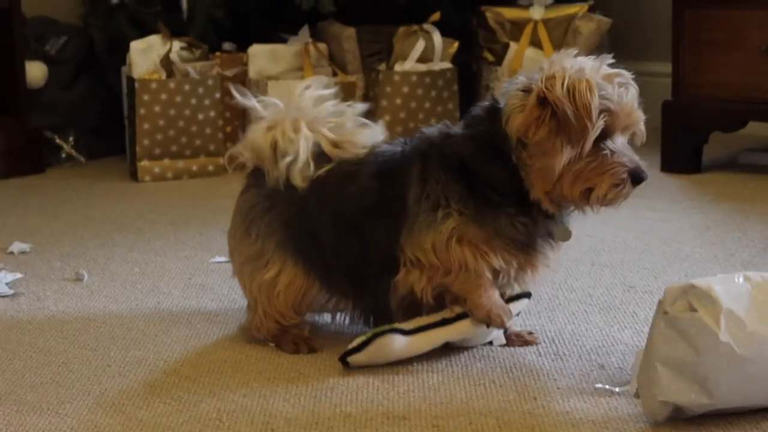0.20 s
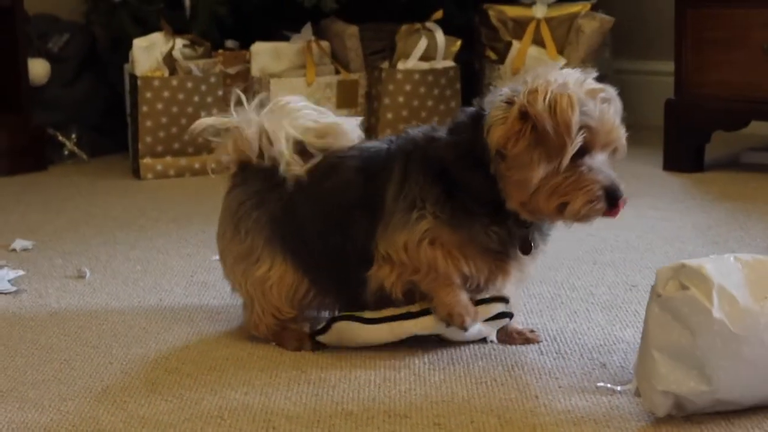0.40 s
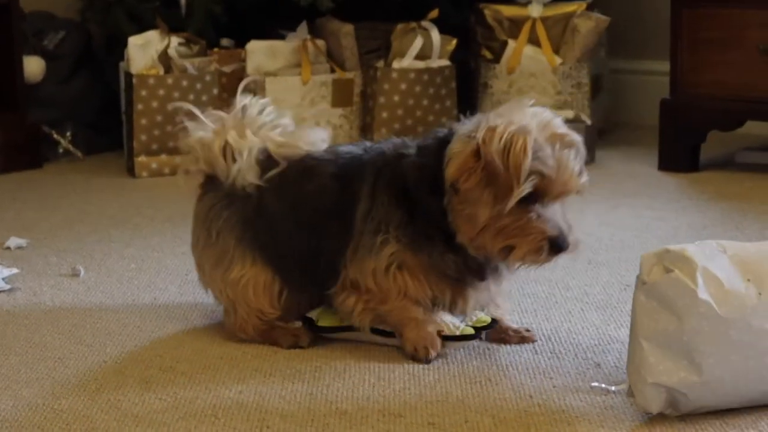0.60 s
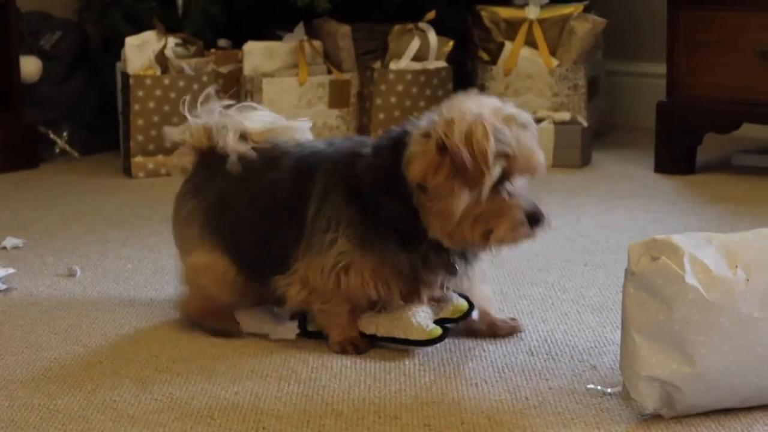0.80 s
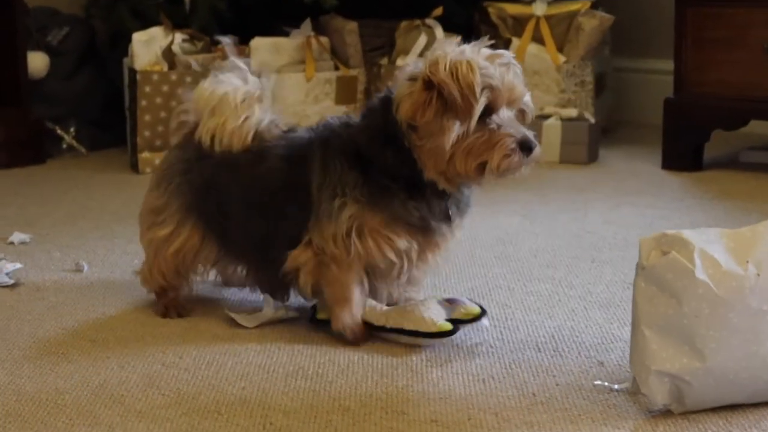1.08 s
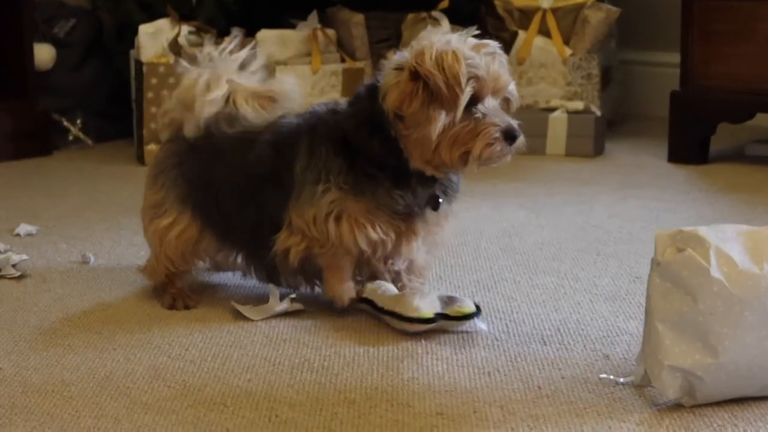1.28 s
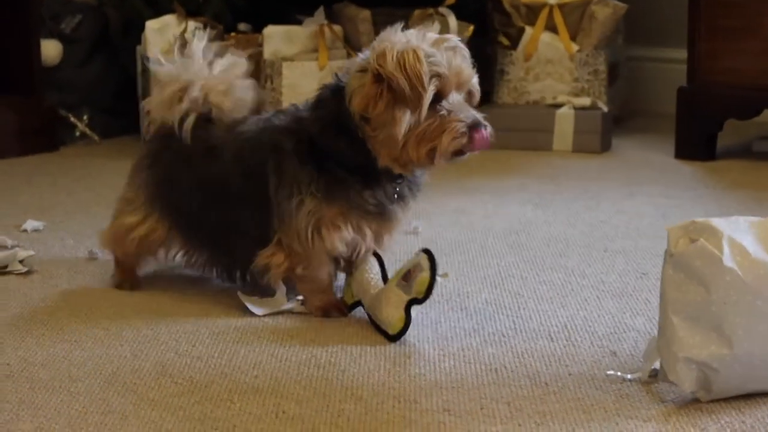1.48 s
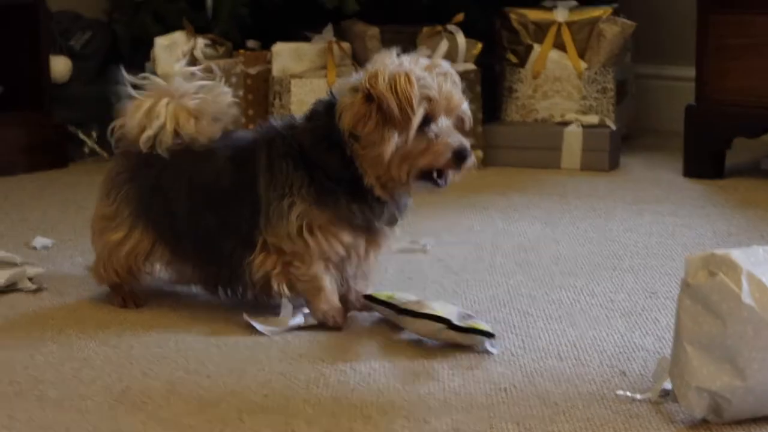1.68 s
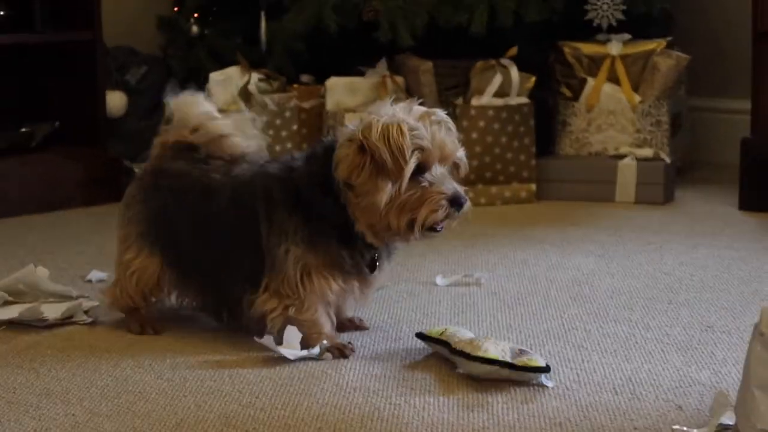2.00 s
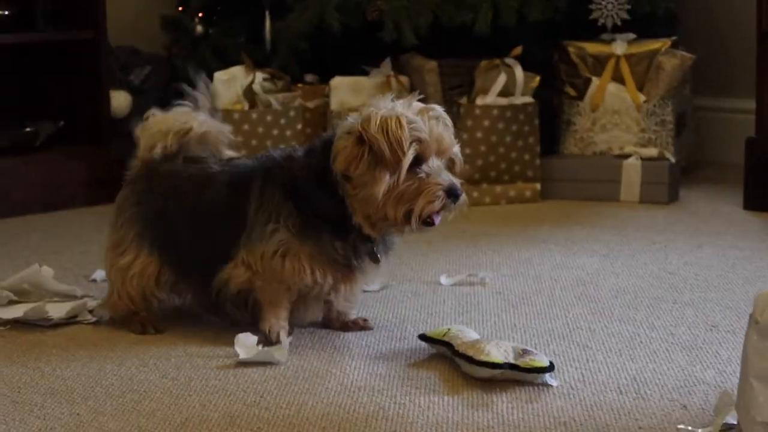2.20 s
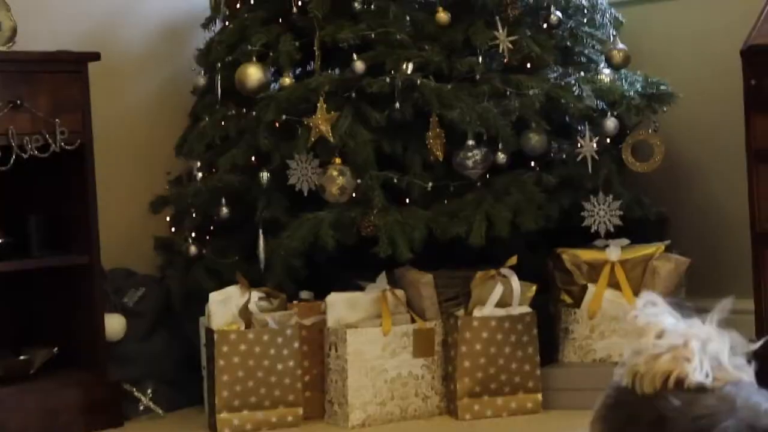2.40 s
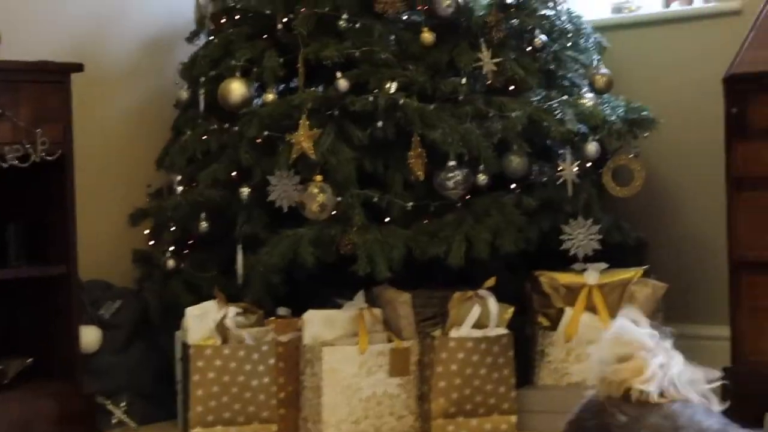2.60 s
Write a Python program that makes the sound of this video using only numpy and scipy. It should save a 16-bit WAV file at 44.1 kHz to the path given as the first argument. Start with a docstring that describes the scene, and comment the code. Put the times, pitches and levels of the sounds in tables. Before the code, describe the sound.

Stiff wrapping paper crumples and rustles in uneven bursts as a small dog plays on carpet

```python
"""Crumpling stiff paper

Stiff paper, most likely gift wrap, is pulled and crumpled in uneven bursts in a carpeted living room.
Each rustle is a swarm of random impulses, tiny buckling creases, that ring brief facets of the sheet.
Larger folds give way with single snaps and dull pops; taut patches resonate as short pitched rasps.
Decaying sines make soft pats and low thumps, and shaped noise makes the rumble of movement and the air.
A short diffuse room tail follows the paper and the pats.
"""
import sys
import numpy as np
from scipy import signal
from scipy.fft import rfft, irfft
from scipy.io import wavfile
from scipy.ndimage import uniform_filter1d

SR = 44100
rng = np.random.default_rng(int(sys.argv[2]) if len(sys.argv) > 2 else 0)


def master(y):
    """Save y as 16-bit WAV."""
    cut = np.clip(np.atleast_2d(y).T, -1, 1)
    pcm = np.round(cut * 32767)  # scale
    wavfile.write(sys.argv[1], SR, pcm.astype(np.int16))


N = 119070  # samples
T = np.arange(N) / SR  # time [s]
TOP_HZ = 15550  # upper limit of the recorder

CREASES_PER_S, CREASE_SPREAD_DB = 1250, 3.5
SLIP_S, SLIP_DB = 0.004, 2  # length and depth of each cluster of creases
ATTACK_SHARE, RELEASE_S = 0.18, 0.01  # swell as a share of a pull's length; decay time constant
RASP_Q = 13.5
FOLLOW_S, FOLLOW_DB = 0.0062, -1  # decay and energy, against the snap, of the creases it drags along
RUSTLE_DB, SNAP_DB = -0.52, 17.5  # added to the levels in their tables
RUMBLE_DB = 4.5  # added to the level curve of the rumble
AIR_DB = -47.5
ROOM_DB, ROOM_GAP_S = -5.5, 0.0032  # tail energy against the direct sound; silence ahead of the tail
SCATTER_S = 0.0006  # peak time of the early scatter envelope
THUMP_S, PAT_S = 0.019, 0.0011  # time to the envelope peak
BUMP_SAG_PER_S = 4.6  # exponential rate at which a bump's pitch falls as the contact slackens


def undb(db):
    """Logarithmic level: convert decibels to amplitude gain."""
    return 10 ** (np.asarray(db) / 20)


def unit(x):
    """Energy normalisation: scale the sum of squares to 1."""
    return x / np.sqrt(np.sum(x ** 2) + 1e-18)


def along(points, hz):
    """Logarithmic frequency scale: interpolate (frequency [Hz], value) points on it."""
    point_hz, values = np.array(points, float).T
    return np.interp(np.log(np.maximum(hz, 1)), np.log(point_hz), values)


def colour(x, points, size=4096):
    """Minimum phase: folding the cepstrum gives a causal filter through (frequency [Hz], gain [dB])."""
    gain = undb(along(points, np.fft.rfftfreq(size, 1 / SR)))
    cepstrum = irfft(np.log(gain))
    cepstrum[1:size // 2] *= 2
    cepstrum[size // 2 + 1:] = 0
    response = irfft(np.exp(rfft(cepstrum)))[:size // 2]
    return signal.fftconvolve(x, response)[:len(x)]


def noise(points):
    """Spectral shaping: filter white noise and scale it to rms 1."""
    return unit(colour(rng.standard_normal(N), points)) * np.sqrt(N)


def air():
    """Stationary random noise: the steady background of the room."""
    # background spectrum: (frequency [Hz], relative density [dB per Hz])
    air_spectrum = [(30, -21), (70, -5.5), (150, -13), (450, -16.5), (1340, -24), (2300, -22),
                    (7600, -38.5), (15000, -57)]
    return undb(AIR_DB) * noise(air_spectrum)


def rumble():
    """Amplitude modulation: low noise follows the level of movement on the carpet."""
    # spectrum of the movement: (frequency [Hz], relative density [dB per Hz])
    rumble_spectrum = [(25, -50), (38, -6), (52, -8), (75, -12), (108, 5), (160, 1.5), (230, 6.5),
                       (330, -3), (480, -32)]
    # strength of the movement ahead of RUMBLE_DB: (time [s], level [dB])
    level_curve = [(0, -55), (.6, -51.5), (1.95, -48.5), (2.4, -55.5), (2.55, -82)]
    times, db = np.array(level_curve).T
    return noise(rumble_spectrum) * undb(np.interp(T, times, db) + RUMBLE_DB)


def room_tail(size=16384, count=9):
    """Reverberation: diffuse echoes, even in colour, decay at a rate that depends on frequency."""
    # decay of the furnished room: (frequency [Hz], time to fall by 60 dB [s])
    decay_times = [(200, 0.6), (550, 0.22), (1400, 0.32), (3700, 0.31), (10000, 0.13)]
    spectrum, t = rfft(rng.standard_normal(size)), T[:size]
    hz, centres = np.fft.rfftfreq(size, 1 / SR), np.geomspace(100, TOP_HZ, count)
    tail = np.zeros(size)
    for centre_hz, pick in zip(centres, np.eye(count)):
        weight = along(list(zip(centres, pick)), hz)  # overlapping triangular bands
        decay = np.exp(-np.log(1000) * t / along(decay_times, centre_hz))
        tail += irfft(spectrum * weight, size) * decay
    # divide by the smoothed spectrum to even out the colour
    modes = rfft(tail, 2 * size)
    tail = irfft(modes / np.sqrt(uniform_filter1d(abs(modes) ** 2, size=70)))[:size]
    onset = np.clip(t / ROOM_GAP_S - 1, 0, 1)
    return unit(tail * onset) * undb(ROOM_DB)


def room_paths():
    """Direct and diffuse fields: the mid path has a direct impulse, the side path early scatter."""
    centre, across = room_tail(), room_tail()
    centre[0] += 1
    lag = T[:len(across)] / SCATTER_S
    across += unit(rng.standard_normal(len(lag)) * lag * np.exp(-lag))
    return unit(centre), unit(across)


def bumps(rows, peak_s):
    """Damped oscillation: cushioned bumps swell and die while their pitch falls exponentially."""
    out = np.zeros(N)
    for start, hz, db in rows:
        age = np.maximum(T - start, 0)
        envelope = age / peak_s * np.exp(1 - age / peak_s)
        cycles = hz * (1 - np.exp(-BUMP_SAG_PER_S * age)) / BUMP_SAG_PER_S
        out += undb(db) * envelope * np.sin(2 * np.pi * cycles)
    return out


def thumps():
    """Damped oscillation: soft low thumps with a slow swell."""
    # soft low thumps: (time [s], starting pitch [Hz], envelope peak [dB])
    thump_events = [(0.57, 116, -40), (.595, 215, -39), (.885, 66.4, -38.5), (1.35, 119, -37.5),
                    (1.5, 255.6, -34.5), (1.766, 80, -41)]
    return bumps(thump_events, THUMP_S)


def pats():
    """Damped oscillation: dull pats, probably paws and the toy on the carpet."""
    # dull pats, ahead of the room: (time [s], starting pitch [Hz], envelope peak [dB])
    pat_events = [(.142, 556, -25.5), (.221, 515, -19.5), (.403, 634, -19.5), (.457, 620, -43),
                  (.492, 587, -40), (.556, 640, -21.5), (.79, 580, -22.5), (1.029, 695, -19),
                  (1.882, 520, -24), (2.168, 510, -24)]
    return bumps(pat_events, PAT_S)


def pull(length, size=8820):
    """Transient envelope: a pull swells linearly, holds and lets go exponentially."""
    age = T[:size]
    swell = np.clip(age / (ATTACK_SHARE * length), 0, 1)
    return swell * np.exp(-np.maximum(age - length, 0) / RELEASE_S)


def swarm_of_creases(shape):
    """Stick-slip and random impulses: creases of uneven size cluster as the paper catches and slips."""
    size, hold = len(shape), int(SLIP_S * SR)
    grip = rng.standard_normal(size)[np.arange(size) // hold]  # one value for each cluster
    db = CREASE_SPREAD_DB * np.clip(rng.standard_normal(size), -2, 2)
    db += SLIP_DB * np.clip(grip, -1, 1)
    buckles = rng.random(size) < CREASES_PER_S / SR
    return buckles * undb(db) * rng.choice([-1, 1], size) * shape


def rasps():
    """Resonance: creases drive one taut patch, and the rustle takes on its pitch."""
    # rasps of taut paper, ahead of the room: (time [s], length [s], pitch [Hz], level [dB])
    rasp_events = [(0.325, 0.019, 3340, -34.5), (0.542, 0.01, 3000, -31.5), (1.951, 0.063, 1780, -34),
                   (1.983, 0.011, 4160, -36), (2.037, 0.024, 1600, -34.5), (2.14, .05, 2370, -36.5)]
    out = np.zeros(2 * N)
    for start, length, hz, db in rasp_events:
        shape, i = pull(length), int(start * SR)
        resonator = signal.iirpeak(hz, RASP_Q, fs=SR)
        ring = signal.lfilter(*resonator, swarm_of_creases(shape))
        out[i:i + len(ring)] += undb(db) * np.linalg.norm(shape) * unit(ring)
    return out[:N]


def sheet_response(low_hz, high_hz, size=1024):
    """Transfer function: the sheet's colour within one frequency range."""
    # colour of the sheet: (frequency [Hz], relative density [dB per Hz])
    sheet_colour = [(150, 1), (225, 1), (330, -1.5), (480, 0.5), (720, 2), (950, -2.5), (1400, -4.5),
                    (2200, -3.5), (3200, -6), (4400, -15), (6000, -17.5), (8000, -23.5), (11000, -31),
                    (15000, -24)]
    band = signal.butter(3, [low_hz, high_hz], "band", fs=SR, output="sos")
    return rfft(signal.sosfilt(band, colour(signal.unit_impulse(size), sheet_colour)))


def sheet_ranges():
    """Frequency-dependent damping: each range of the sheet pairs a response with a ring time."""
    # crackle, body and treble of the sheet: (low edge [Hz], high edge [Hz], ring time constant [s])
    range_rows = [(980, 5200, 0.0011), (282, 898, 0.0023), (3710, 12000, 0.0012)]
    return [(sheet_response(low, high), ring_s) for low, high, ring_s in range_rows]


def facet(response, ring_s, size=1024):
    """Impulse response: one patch of paper rings briefly when it buckles; no two are alike."""
    ring = rng.standard_normal(size) * np.exp(-T[:size] / ring_s)
    return unit(irfft(rfft(ring) * response))


def snaps(ranges, size=900):
    """Sudden buckling: a large fold gives a bright tick or dull pop, and neighbouring creases follow."""
    # snaps of single folds ahead of SNAP_DB: (time [s], crackle [dB], body [dB], treble [dB])
    snap_events = [(0.328, -30.5, -34, -30.5), (0.337, -29.5, -46, -26.5), (.345, -34, -42, -26),
                   (.547, -30, -18, -25.5), (0.578, -14.5, -20, -27), (.655, -24, -22, -45),
                   (.702, -17, -25.5, -27.5), (.949, -25, -43, -36), (1.022, -32, -34, -37),
                   (1.036, -19.5, -33, -25.5), (1.179, -38, -31, -21), (1.215, -23, -20, -22.5),
                   (1.309, -39, -42, -31), (1.351, -19, -13.5, -27), (1.367, -22, -20, -27),
                   (1.38, -15, -17, -25), (1.426, -41, -41, -24), (1.493, -24.5, -20, -30.5),
                   (1.616, -16.5, -45, -26), (1.625, -28, -16.5, -23), (1.644, -15, -14, -31),
                   (1.704, -18.5, -22, -26.5), (1.801, -36, -20, -32), (1.946, -21.5, -43, -26),
                   (1.955, -40, -50, -20), (2.043, -50, -25.5, -27), (2.242, -36, -35, -31),
                   (2.274, -30, -56, -22.5), (2.424, -37, -35, -35)]
    out = np.zeros(N + 4 * size)
    for start, *levels in snap_events:
        buckles = rng.random(size) < CREASES_PER_S / SR
        followers = buckles * rng.standard_normal(size) * np.exp(-T[:size] / FOLLOW_S)
        push = unit(followers) * undb(FOLLOW_DB)
        push[0] += 1  # the fold itself
        i = int(start * SR)
        for db, (response, ring_s) in zip(levels, ranges):
            snap = unit(signal.fftconvolve(push, facet(response, ring_s)))
            out[i:i + len(snap)] += undb(db + SNAP_DB) * snap
    return out[:N]


def rustles(ranges, count=7):
    """Superposed impulse responses: each pull buckles a few fresh facets, so its colour is its own."""
    # pulls ahead of RUSTLE_DB: (time [s], length [s], crackle [dB], body [dB], treble [dB])
    pull_events = [(0.0, 0.064, -56.5, -45.5, -73), (0.092, 0.039, -42.5, -41.5, -79),
                   (0.136, 0.049, -40, -42, -70), (0.215, 0.024, -31.5, -36.5, -42.5),
                   (0.263, 0.13, -46.5, -51, -55), (0.331, 0.03, -44, -52, -56),
                   (0.401, 0.13, -47, -41, -61), (0.551, 0.026, -34.5, -35, -36),
                   (0.579, 0.022, -31, -33, -30.5), (0.625, 0.096, -38.5, -42.5, -41),
                   (0.699, 0.022, -34, -33, -37), (.74, .15, -41, -39.5, -49),
                   (.786, 0.012, -35, -48, -37.5), (0.895, 0.03, -27.5, -34.5, -38.5),
                   (.938, 0.038, -37.5, -38.5, -45.5), (1.02, 0.035, -30.5, -33.5, -39),
                   (1.076, 0.032, -32.5, -37, -43.5), (1.106, 0.088, -42.5, -43.5, -55),
                   (1.168, 0.019, -32.5, -31.5, -37.5), (1.219, 0.026, -33, -40.5, -40),
                   (1.243, 0.043, -35, -32.5, -37), (1.3, 0.048, -31, -31, -41),
                   (1.348, 0.045, -25, -25.5, -30.5), (1.396, 0.037, -28.5, -34.5, -37.5),
                   (1.439, 0.064, -38, -45, -66), (1.493, 0.045, -43.5, -42, -47.5),
                   (1.573, 0.045, -30.5, -35.5, -37), (1.616, 0.029, -24.5, -29.5, -28.5),
                   (1.647, 0.033, -26, -32, -35), (1.699, 0.036, -44, -37.5, -38),
                   (1.769, 0.1, -42, -43, -51), (1.872, 0.051, -30, -31, -45),
                   (1.932, 0.069, -31.5, -35.5, -45), (2.021, 0.04, -33.5, -33.5, -39.5),
                   (2.135, 0.073, -33.5, -35, -39.5), (2.232, .1, -32, -38.5, -42),
                   (2.336, 0.035, -34.5, -40.5, -55), (2.419, 0.023, -33.5, -33, -48)]
    out = np.zeros(2 * N)
    for start, length, *levels in pull_events:
        shape, i = pull(length), int(start * SR)
        creases = swarm_of_creases(shape)
        patch = rng.integers(0, count, len(shape))  # the facet that each crease rings
        for db, (response, ring_s) in zip(levels, ranges):
            swarm = sum(signal.fftconvolve(creases * (patch == k), facet(response, ring_s))
                        for k in range(count))
            gain = undb(db + RUSTLE_DB) * np.linalg.norm(shape)
            out[i:i + len(swarm)] += gain * unit(swarm)
    return out[:N]


def scene():
    """Interchannel coherence: the two microphones agree in the bass and differ in the treble."""
    # filter that sets the stereo width: (frequency [Hz], side gain [dB])
    side_gain = [(60, -10), (110, -15.5), (200, -10), (380, -17.5), (700, -16.5), (1290, -20),
                 (2380, -14.5), (4400, -4), (8120, 0.5), (15000, 5.5)]
    ranges = sheet_ranges()
    dry_sources = rustles(ranges) + snaps(ranges) + rasps() + pats()
    # each path has its own draw of the rumble and the air
    mid, side = (signal.fftconvolve(dry_sources, path)[:N] + rumble() + air() for path in room_paths())
    mid = mid + thumps()
    side = colour(side, side_gain)
    return np.array([mid + side, mid - side])


def record(dry):
    """Band limitation: the recorder cuts the top with a steep elliptic low-pass."""
    # order 10, 0.2 dB ripple, 80 dB rejection
    low_pass = signal.ellip(10, 0.2, 80, TOP_HZ, fs=SR, output="sos")
    return signal.sosfilt(low_pass, dry)


dry = scene()
out = record(dry)
master(out)
```